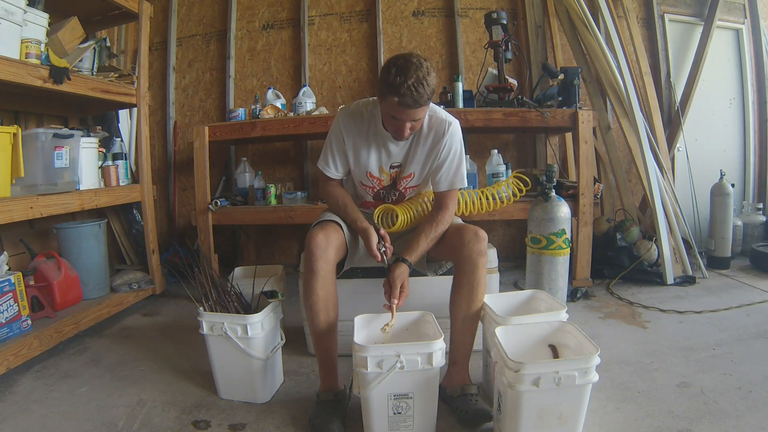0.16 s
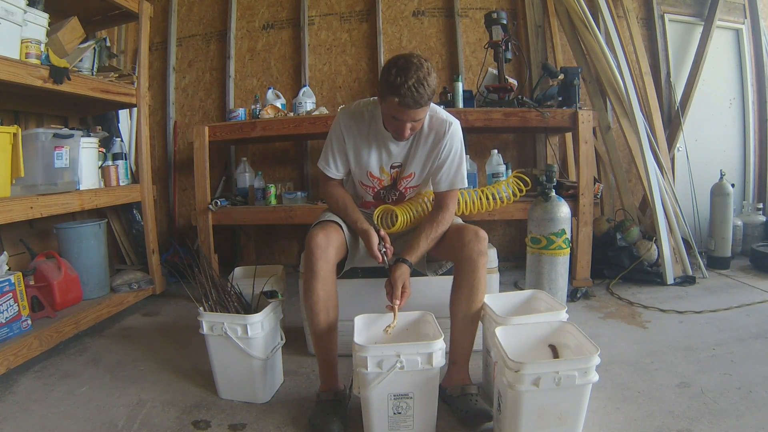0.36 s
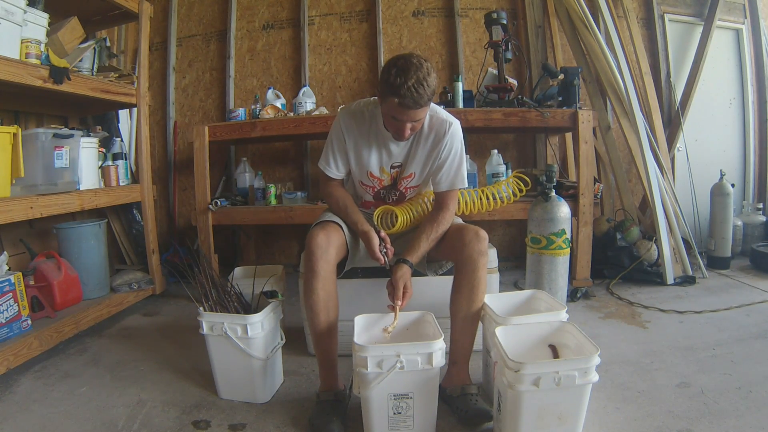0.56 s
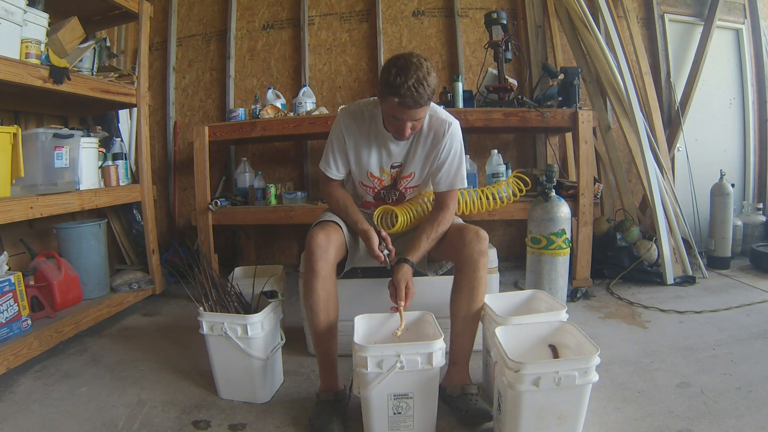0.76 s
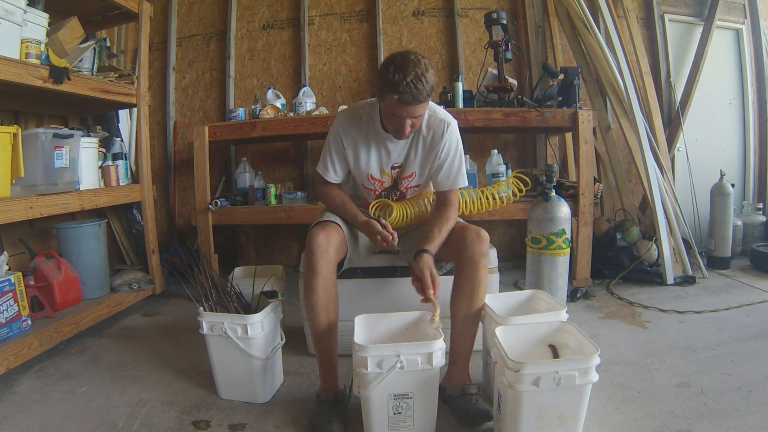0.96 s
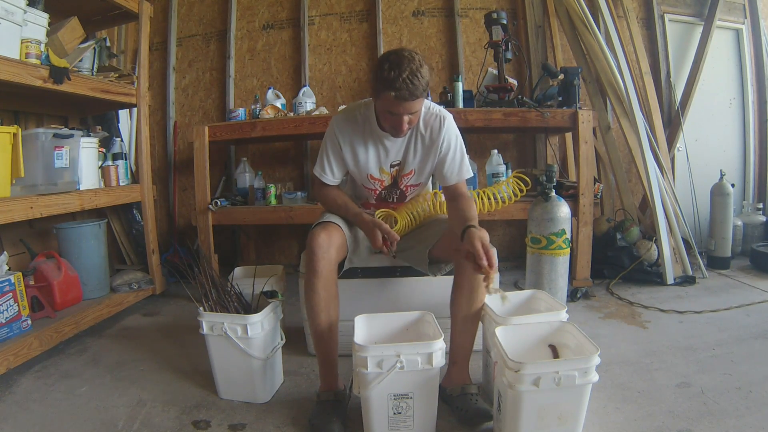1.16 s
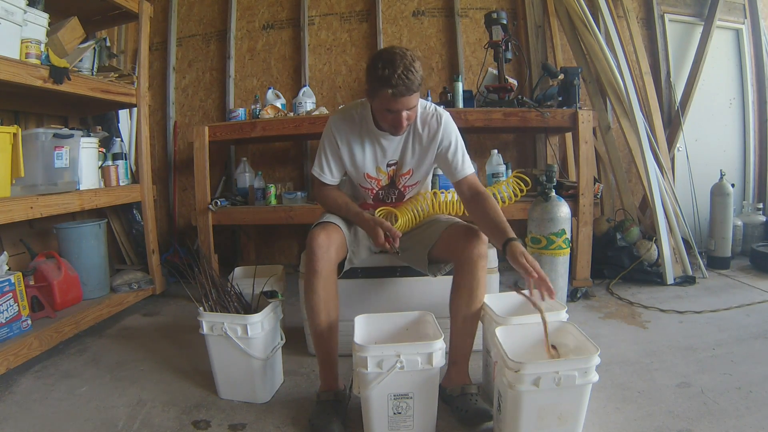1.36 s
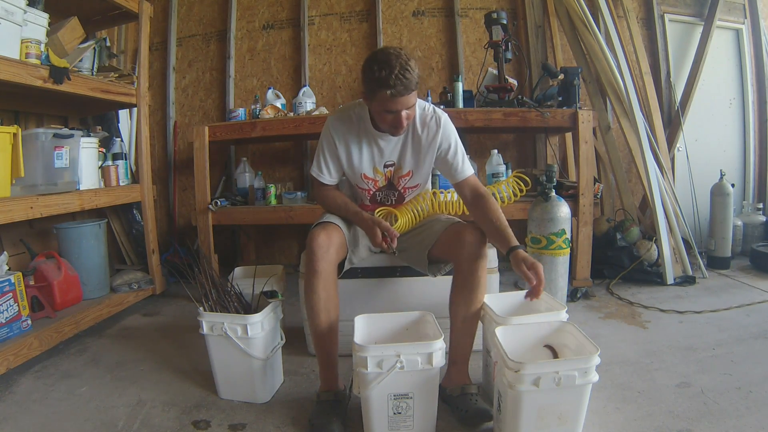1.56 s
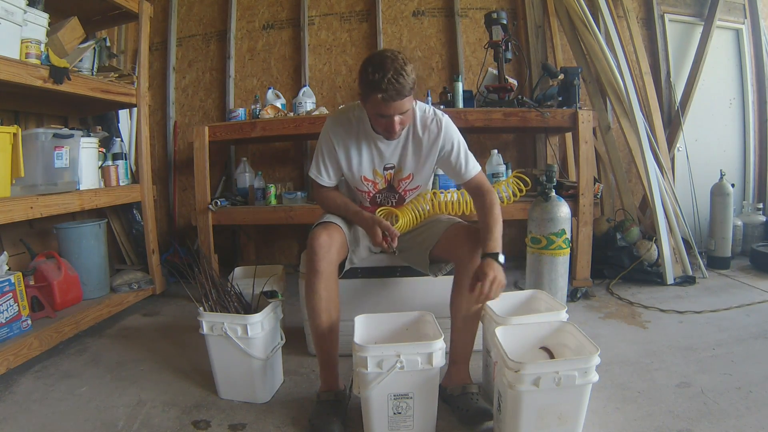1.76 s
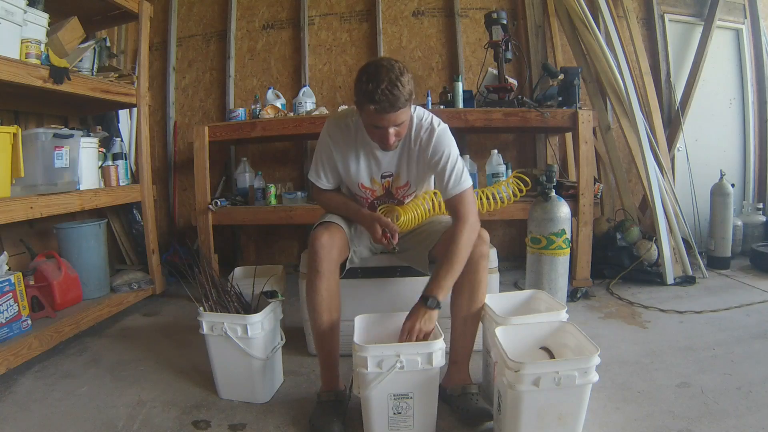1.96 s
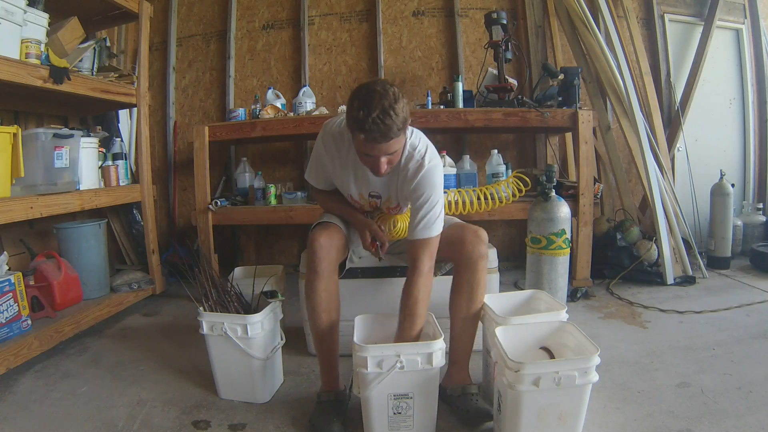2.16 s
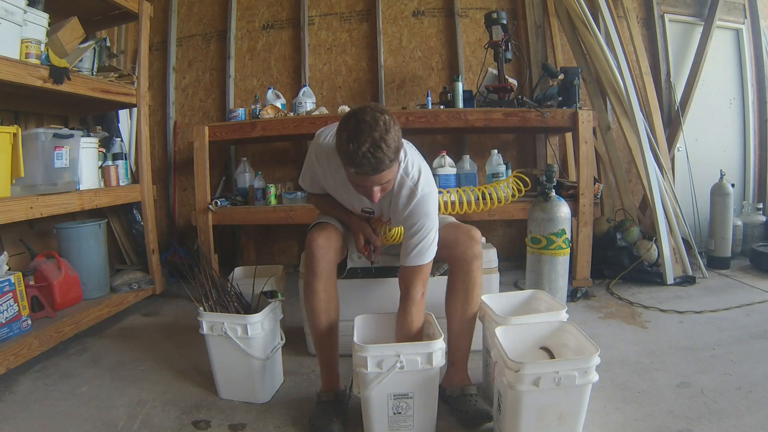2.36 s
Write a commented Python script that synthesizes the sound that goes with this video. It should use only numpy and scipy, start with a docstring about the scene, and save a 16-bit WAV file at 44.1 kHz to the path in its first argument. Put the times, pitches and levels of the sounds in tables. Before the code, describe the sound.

In a quiet, humming garage, an air nozzle hisses and blasts a hollow shell leg. After a pause, the shell knocks and rattles in a bucket, then a hand rustles among others, heard from a short distance.

```python
"""An air gun leaks, then blasts a sputtering jet into a hollow shell leg; early in the blast the plug pops out.
The hiss is shaped noise coloured by the shell's resonances, and it rings on in a garage.
The shell is tossed into a plastic bucket: ringing modes knock, bright bursts clack, friction noise rattles.
Later a hand rummages in another bucket. A low hum, room air and a thin whine lie under all."""
import sys
import numpy as np
from scipy import signal
from scipy.fft import rfft, irfft, next_fast_len
from scipy.io import wavfile
from scipy.ndimage import map_coordinates

SR = 44100
rng = np.random.default_rng(int(sys.argv[2]) if len(sys.argv) > 2 else 0)


def convert_level_to_amplitude(level_db):
    """Map a level in decibels to its linear amplitude factor."""
    exponent = np.asarray(level_db, float) / 20
    return 10 ** exponent


def bounce(signal):
    """Save signal as a 16-bit WAV file at the path given by the first command-line argument."""
    frames = np.transpose(np.atleast_2d(signal))
    limited = np.clip(frames, -1, 1)
    pcm = np.round(limited * 32767).astype(np.int16)
    wavfile.write(sys.argv[1], SR, pcm)


N = 110250
T = np.arange(N) / SR


def unit(x):
    """Normalization: scale to rms 1."""
    return x / np.sqrt(np.mean(x ** 2) + 1e-20)


def along(points, hz):
    """Interpolate (Hz, value) points on a logarithmic frequency axis."""
    f, v = np.transpose(points)
    return np.interp(np.log(hz + 1), np.log(f + 1), v)


def level(rows):
    """Amplitude envelope: straight lines in dB through (s, dB) rows, silent outside them."""
    s, db = np.transpose(rows)
    return convert_level_to_amplitude(np.interp(T, s, db, left=-200, right=-200))


def wobble(rate):
    """Random modulation: a smooth curve through random knots, rate knots a second."""
    knots = rng.standard_normal(int(N * rate / SR) + 4)
    return map_coordinates(knots, [T * rate])


def filtered(x, response):
    """Linear filtering: multiply the spectrum by a response of frequency."""
    m = next_fast_len(len(x) + 8192)
    return irfft(rfft(x, m) * response(np.fft.rfftfreq(m, 1 / SR)), m)[:len(x)]


def noise(spectrum, size=N):
    """Spectral shaping: white noise given a spectrum, at rms 1."""
    white = rng.standard_normal(size)
    return unit(filtered(white, lambda hz: convert_level_to_amplitude(along(spectrum, hz))))


def add(track, s, sound):
    """Superposition: mix a sound in at time s."""
    part = track[round(s * SR):][:len(sound)]
    part += sound[:len(part)]


# Spectrum of the still room's air: frequency_hz, level_db (per Hz, relative)
ROOM_AIR_SPECTRUM = [(12, -50), (28, -12), (42, -19), (65, -7), (88, -9), (163, -12.5), (270, -15.5),
                     (350, -20.5), (400, -24.5), (600, -25.5), (1200, -31), (1700, -39), (4000, -41),
                     (6500, -43.5), (8500, -42), (10000, -45), (13000, -51.5), (15300, -52), (16000, -58)]


def room_air():
    """Broadband background noise, its level slowly drifting."""
    return convert_level_to_amplitude(-49.5 + 0.8 * wobble(5.3)) * noise(ROOM_AIR_SPECTRUM)


def hum():
    """Frequency and amplitude modulation: a low sine wavers in pitch and level."""
    pitch_hz = 57.2 + 4 * wobble(35)
    level_db = -47 + 2.3 * wobble(9.1)
    return convert_level_to_amplitude(level_db) * np.sin(2 * np.pi * np.cumsum(pitch_hz) / SR)


def whine():
    """Narrow-band noise: a thin, rough tone from a Gaussian passband."""
    centre_hz, width_hz, level_db = 13100, 60, -78
    passband = lambda hz: np.exp(-((hz - centre_hz) / width_hz) ** 2)
    return convert_level_to_amplitude(level_db) * unit(filtered(rng.standard_normal(N), passband))


# Air flow of the leak: time_s, level_db
LEAK_FLOW = [(.138, -76), (.15, -52), (.16, -38), (.18, -38.5), (.21, -34), (.225, -44.5), (.39, -26),
             (.41, -80)]
# Spectrum of the leaking air: frequency_hz, level_db (per Hz, relative)
LEAK_SPECTRUM = [(470, -49), (900, -14), (1900, -12), (2400, -18), (3200, -6.5), (4180, 1), (5400, -3.5),
                 (6140, -3), (8000, -2.5), (9300, -7.5), (11700, -3.5), (13500, -13), (15300, -13.5),
                 (16000, -32.5)]


def leak():
    """Turbulence noise: escaping air hisses as its flow swells and falls."""
    return level(LEAK_FLOW) * noise(LEAK_SPECTRUM)


# Reverberation time of the garage: frequency_hz, t60_s
GARAGE_DECAY = [(150, 0.32), (1000, 0.52), (4000, 0.43), (8000, 0.45), (15000, 0.21)]


def garage(x):
    """Reverberation: convolve with a noise tail in which each frequency dies at its own speed."""
    hz, t, z = signal.stft(rng.standard_normal(SR), SR, nperseg=256)
    decay = convert_level_to_amplitude(-60 * t / along(GARAGE_DECAY, hz)[:, None])
    tail = signal.istft(z * decay, SR, nperseg=256)[1]
    delayed = np.pad(x, (200, 0))  # samples before the tail starts
    return signal.fftconvolve(delayed, tail / np.linalg.norm(tail))[:N]


# Wet surge while the plug moves: time_s, level_db
SURGE_FLOW = [(.2095, -70), (.2115, -37), (.216, -18.5), (.225, -22), (.24, -30.5), (.265, -28), (.3, -45),
              (.32, -80)]
# Spectrum of the surge: frequency_hz, level_db (per Hz, relative)
SURGE_SPECTRUM = [(1200, -43), (1900, -20.5), (2400, -4.5), (2900, 3.5), (3900, -5.5), (4600, -0.5),
                  (5300, -7.5), (5900, -5.5), (7600, -11), (9000, -25.5), (12000, -19), (14000, -39),
                  (16000, -50)]


def surge():
    """Modulated turbulence: a wet, darker rush of noise, uneven in level."""
    return level(SURGE_FLOW) * convert_level_to_amplitude(2.5 * wobble(249)) * noise(SURGE_SPECTRUM)


# Plug splatting into the bucket below: time_s, level_db
SPLAT_LEVEL = [(.2095, -48), (.2125, -19.5), (.215, -22.5), (.237, -24.5), (.275, -35.5), (.335, -44.5),
               (.4, -48.5), (.43, -56)]
# Spectrum of the splat: frequency_hz, level_db (per Hz, relative)
SPLAT_SPECTRUM = [(35, -30), (60, -6), (120, -12.5), (184, 1.5), (276, 3.5), (390, -16), (533, -4),
                  (650, -8.5), (780, -4), (950, -13), (1150, 0.5), (1300, -6.5), (1900, -22.5),
                  (2470, -60.5)]


def splat():
    """Impact noise: a low, lumpy burst of shaped noise."""
    return level(SPLAT_LEVEL) * convert_level_to_amplitude(2.2 * wobble(89.5)) * noise(SPLAT_SPECTRUM)


# Air flow of the full jet: time_s, level_db
JET_FLOW = [(.2105, -74), (.2125, -21), (.217, -22.5), (.225, -26), (.24, -24), (.27, -23), (.33, -25),
            (.385, -29), (.4, -35), (.44, -55), (.47, -94)]
# Spectrum of the jet before the shell colours it: frequency_hz, level_db (per Hz, relative)
JET_SPECTRUM = [(180, -40), (300, -5.5), (453, -26.5), (561, -9.5), (997, -13), (1140, -4.5), (1740, -18.5),
                (2350, -4), (2500, -2.5), (4680, -3.5), (5170, -10.5), (5800, 1), (6610, -8), (7540, -2.5),
                (9040, -7), (11000, -11.5), (15300, -13.5)]
# Resonances of the hollow shell: pitch_hz, width_hz, gain_db (beside the direct jet)
SHELL_RESONANCES = [(1070, 430, -5), (2360, 200, -5.5), (2820, 270, -5), (4160, 550, 3), (4840, 200, 3),
                    (5790, 250, 1), (7270, 300, -9), (10800, 300, -2.5)]


def jet():
    """Resonance: sputtering turbulence excites the hollow shell, whose resonances add to the jet."""
    def shell(f):
        response = 1
        for c, w, db in SHELL_RESONANCES:
            response = response + convert_level_to_amplitude(db) * 1j * f * w / (c * c - f * f + 1j * f * w)
        return np.abs(response)

    onset_s, sputter_t60_s = JET_FLOW[1][0], 0.1
    # the unevenness fades away from the onset to a small remainder
    sputter_db = 3.5 * convert_level_to_amplitude(-60 * np.abs(T - onset_s) / sputter_t60_s) + 0.25
    flow = level(JET_FLOW) * convert_level_to_amplitude(sputter_db * wobble(219.64))
    return flow * unit(filtered(noise(JET_SPECTRUM), shell))


def struck_bucket(blows, modes):
    """Modal synthesis: each blow rings the wall's modes; softer blows lose the high ones."""
    out, t = np.zeros(N), T[:SR // 4]
    scatter = rng.standard_normal((len(blows), 2, len(modes)))
    for (s, db, soft, ratio), (level_scatter, pitch_scatter) in zip(blows, scatter):
        ring = 0
        for (hz, gain_db, t60), u, v in zip(modes, level_scatter, pitch_scatter):
            decay = convert_level_to_amplitude(gain_db + 0.59 * u - 60 * t / t60)
            softening = 1 / (1 + (hz * abs(soft) * 2) ** 4)
            ring = ring + decay * softening * np.sin(2 * np.pi * hz * (ratio + 0.013 * v) * t)
        add(out, s, convert_level_to_amplitude(db) * ring * (1 - np.exp(-t / 0.00088)))
    return out


# Blows on a hollow bucket: start_s, level_db, softness_s, pitch_ratio (a pressed wall shifts it)
BUMP_BLOWS = [(.2128, -21, 0.00018, 0.914), (1.167, -22.5, 0.00072, 1.01), (1.4238, -17, 0.00054, .99),
              (1.449, -38, 0.0027, 0.81), (1.482, -65, .001, 1.01), (1.599, -40.5, 0.0006, 1.38),
              (1.612, -32.5, 0.0013, 1.01), (1.628, -33, .0012, 0.9), (1.646, -31, 0.0013, 0.75),
              (1.68, -40, 0.00081, 1.05), (1.871, -27, 0.00092, 0.99), (1.891, -31.5, 0.00052, 1.01),
              (2.321, -31, 0.00061, 0.92), (2.342, -24.5, 0.0013, 1.05), (2.356, -30, 0.00095, 1.01),
              (2.367, -26.5, 0.00042, 1.16)]
# Modes of the hollow bucket: pitch_hz, level_db, t60_s
HOLLOW_MODES = [(188, -21.5, 0.034), (278.3, 0, 0.077), (314.7, -5.5, 0.073), (395, -17.5, 0.092),
                (535.7, -5, 0.06), (658, -5.5, 0.046), (785, -4.5, 0.042), (1006, -8, 0.06),
                (1217, -4, 0.052), (1420, -21, 0.024)]


def bucket_bumps():
    """Free vibration: a hollow bucket rings as it is bumped."""
    return struck_bucket(BUMP_BLOWS, HOLLOW_MODES)


def snap():
    """Pressure pulse: a sharp suction dip between small rises as the plug leaves."""
    start_s, width_s, level_db = 0.2169, 0.000045, -3
    u = (T - start_s) / width_s
    return -convert_level_to_amplitude(level_db) * (1 - u ** 2) * np.exp(-u ** 2 / 2)


# Pops of the plug: start_s, level_db, pitch_hz
PLUG_POPS = [(0.2169, -8, 3770), (0.222, -9.5, 3780), (0.234, -12, 4040), (0.2414, -10.5, 4100)]


def pops():
    """Damped oscillation: the escaping plug gives short, fast-dying sines."""
    out, t = np.zeros(N), T[:SR // 20]
    for s, db, hz in PLUG_POPS:
        decay = convert_level_to_amplitude(db - 60 * t / 0.017)  # t60 in s
        add(out, s, decay * (1 - np.exp(-t / 0.0003)) * np.sin(2 * np.pi * hz * t))
    return out


def friction(rows, spectrum, lump_db):
    """Friction noise: noise made lumpy by slow and fast random swings, then levelled."""
    lumps = convert_level_to_amplitude(1.56 * wobble(45) + lump_db * wobble(400))
    return level(rows) * unit(lumps * noise(spectrum))


# Shell rattling on plastic: time_s, level_db
RATTLE_LEVEL = [(1.14, -78), (1.15, -44), (1.185, -33), (1.195, -27.5), (1.25, -37), (1.31, -44),
                (1.33, -36.5), (1.4, -52), (1.5, -87)]
# Spectrum of the rattle: frequency_hz, level_db (per Hz, relative)
RATTLE_SPECTRUM = [(240, -21), (400, -4.5), (703, 0.5), (807, -2.5), (1110, 2), (1420, -9), (1780, -22.5),
                   (2490, -11), (3130, -27), (3880, -13.5), (5430, -27), (6040, -17.5), (8060, -51),
                   (9390, -42), (15300, -48)]


def rattle():
    """Friction noise: the tossed shell rattles with deep, lumpy swings."""
    return friction(RATTLE_LEVEL, RATTLE_SPECTRUM, 3.3)


# Blows on the bucket that catches the shell: start_s, level_db, softness_s, pitch_ratio
CATCH_BLOWS = [(1.1445, -33.5, .0001, 1.01), (1.189, -19.5, 0.00027, 1.045), (1.1945, -26, 0.00017, 1.01),
               (1.216, -21, 0.00078, .99), (1.3205, -27.5, .0001, 1.01), (1.335, -36, 0.00045, 1)]
# Modes of the catching bucket: pitch_hz, level_db, t60_s
CATCHING_MODES = [(230.7, -0.5, 0.18), (302, -4, 0.083), (419, -13.5, 0.12), (527, -5, 0.057),
                  (717, -3, 0.037), (891, -3, 0.086), (968, -2.5, 0.032), (1097, -6, 0.11),
                  (1337, -10.5, 0.082), (1500, -22, .04), (2370, -16, .02)]


def bucket_catch():
    """Free vibration: the catching bucket rings under the tossed shell."""
    return struck_bucket(CATCH_BLOWS, CATCHING_MODES)


def tilted_bursts(rows, spectrum):
    """Transient noise: short bursts, each with its own decay and spectral tilt."""
    out, t = np.zeros(N), T[:SR // 8]
    for s, db, t60, tilt in rows:
        tilted = lambda hz: convert_level_to_amplitude(tilt * np.log2(hz / 4000 + 0.062))
        burst = unit(filtered(noise(spectrum, size=len(t)), tilted))
        decay = convert_level_to_amplitude(db - 5.5 - 60 * t / max(t60, 0.003))
        add(out, s, decay * (1 - np.exp(-t / 0.00023)) * burst)
    return out


# Hard clacks of shell: start_s, level_db (relative), t60_s, tilt_db_per_octave (well above 250 Hz)
SHELL_CLACKS = [(1.1445, -31.5, 0.033, -2.5), (1.1872, -13, 0.025, 4.5), (1.2029, -21, 0.01, 8.5),
                (1.2253, -26, .029, 3), (1.3209, -23.5, 0.015, 8), (1.3324, -36, 0.018, 14)]
# Spectrum of a clack before its tilt: frequency_hz, level_db (per Hz, relative)
CLACK_SPECTRUM = [(880, -34), (1500, -2), (1910, -19.5), (2150, 0.5), (2530, 6.5), (2880, -2), (3960, -2),
                  (5520, -17.5), (5960, -9.5), (7750, -8), (9230, -20), (15300, -37.5)]


def shell_clacks():
    """Hard impact: the shell clacks in brief, bright bursts."""
    return tilted_bursts(SHELL_CLACKS, CLACK_SPECTRUM)


# Hand rummaging in another bucket: time_s, level_db
RUMMAGE_LEVEL = [(1.56, -82), (1.6, -55), (1.7, -72), (1.85, -72), (1.9, -56), (2.0, -61), (2.08, -65),
                 (2.12, -55), (2.146, -41.5), (2.19, -40), (2.24, -44.5), (2.3, -41.5), (2.37, -44),
                 (2.41, -41), (2.45, -41.5), (2.5, -37)]
# Spectrum of the rummaging: frequency_hz, level_db (per Hz, relative)
RUMMAGE_SPECTRUM = [(120, -53), (250, -8.5), (380, -4), (580, -16), (700, 1), (840, -2.5), (935, -9.5),
                    (1300, -5.5), (2000, -21), (2600, -13), (3300, -22), (4000, -19), (5540, -26),
                    (7000, -28.5), (11000, -45), (15300, -51)]


def rummage():
    """Friction noise: the hand rubs with a smoother, less lumpy noise."""
    return friction(RUMMAGE_LEVEL, RUMMAGE_SPECTRUM, 2.36)


# Light ticks of shells under the hand, and one soft, dull bump of a bucket (at 1.947 s):
# start_s, level_db (relative), t60_s, tilt_db_per_octave (well above 250 Hz)
TICKS_AND_BUMP = [(1.5965, -41.5, .025, 10), (1.608, -44, 0.047, 2), (1.8706, -43, 0.026, -3),
                  (1.9275, -42, .015, 1.5), (1.947, -37, 0.065, -8), (2.1465, -26, 0.043, 0.6),
                  (2.168, -30.5, 0.054, -1), (2.2408, -36, 0.038, -2), (2.2687, -35.5, 0.064, 1.5),
                  (2.3151, -37, .023, -8), (2.3603, -28.5, 0.034, -1.2), (2.4241, -26, 0.062, -0.3),
                  (2.441, -45, 0.011, 2.5), (2.4634, -24.5, 0.025, 0), (2.4841, -25, .032, 5.5)]
# Spectrum of these bursts before their tilt: frequency_hz, level_db (per Hz, relative)
TICK_SPECTRUM = [(350, -18), (600, -3), (1250, 3.5), (1870, -10.5), (2700, 0.5), (3540, -8.5), (4280, -0.5),
                 (5540, -20), (7260, -25), (7880, -20), (9270, -38), (11800, -26), (13700, -46),
                 (15300, -44.5)]


def ticks_and_bump():
    """Light impact: shells tick under the hand, and a bucket gives one soft, dull bump."""
    return tilted_bursts(TICKS_AND_BUMP, TICK_SPECTRUM)


# Reverberation beside each direct sound: source, level_db
REVERB_DB = {"jet": -6, "knocks": -6, "clacks": -6, "rubbing": -10}


def scene():
    """Superposition: direct sounds, their reverberation and the background."""
    parts = {
        "jet": leak() + surge() + splat() + jet() + snap() + pops(),
        "knocks": bucket_bumps() + bucket_catch(),
        "rubbing": rattle() + rummage(),
        "clacks": shell_clacks() + ticks_and_bump(),
    }
    mix = room_air() + hum() + whine()
    for name, direct in parts.items():
        mix += direct + convert_level_to_amplitude(REVERB_DB[name]) * garage(direct)
    return mix[None]


def low_pass(x):
    """Removes everything above the highest recorded frequency."""
    return signal.sosfilt(signal.butter(12, 16180, fs=SR, output="sos"), x)


def record(dry):
    """Band limiting: a steep low-pass removes the highest treble."""
    top_hz = 15380
    mix = filtered(dry[0], lambda hz: hz < top_hz)[None]
    return low_pass(mix)


dry = scene()
out = record(dry)
bounce(out)
```